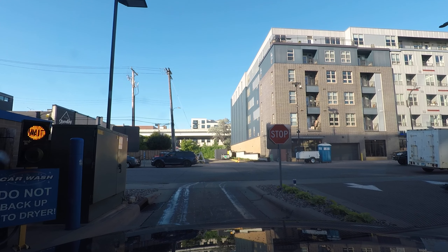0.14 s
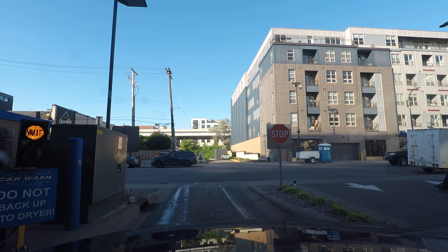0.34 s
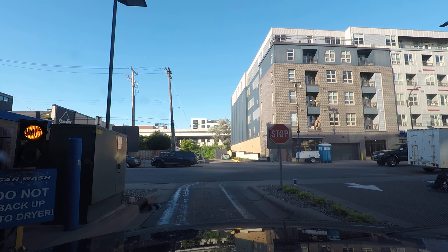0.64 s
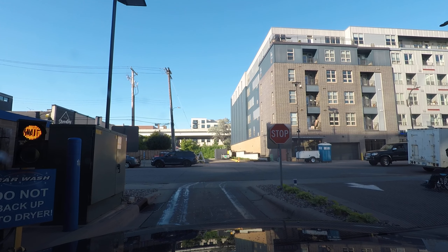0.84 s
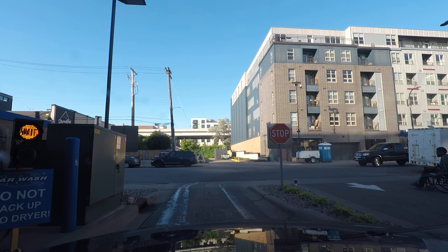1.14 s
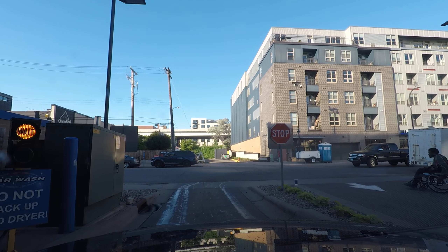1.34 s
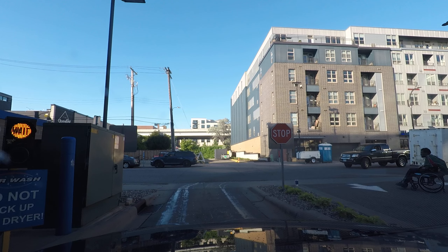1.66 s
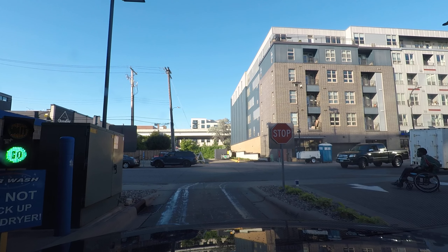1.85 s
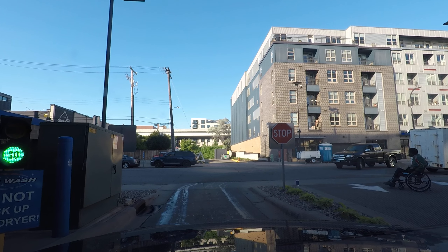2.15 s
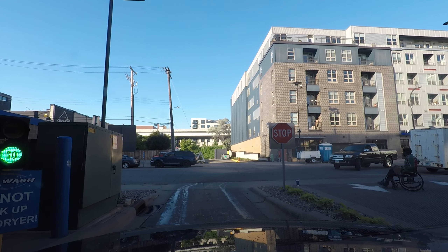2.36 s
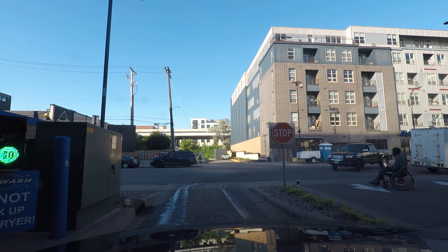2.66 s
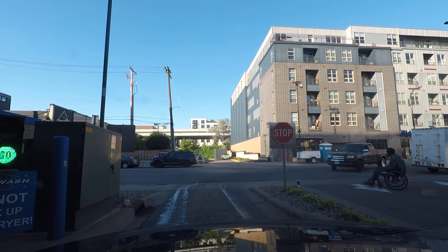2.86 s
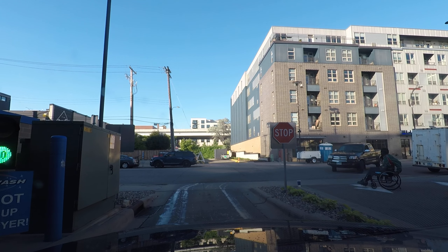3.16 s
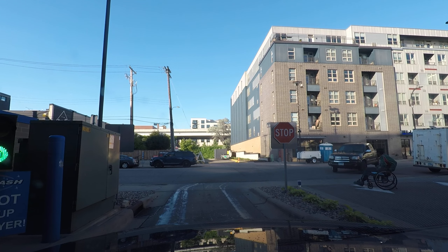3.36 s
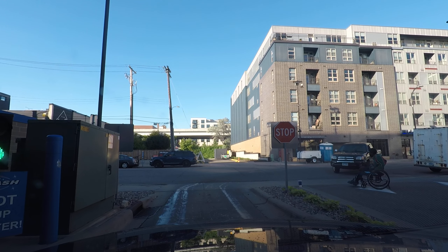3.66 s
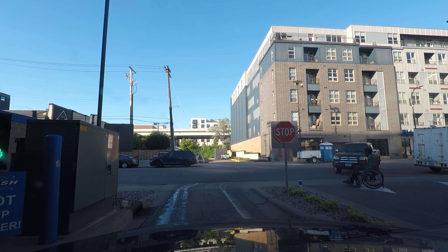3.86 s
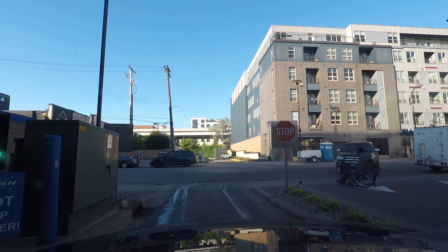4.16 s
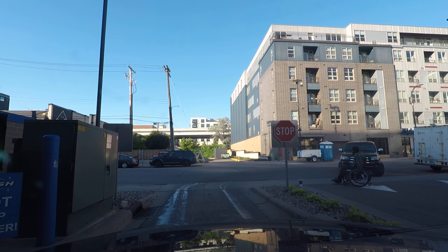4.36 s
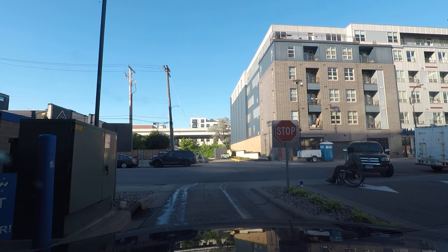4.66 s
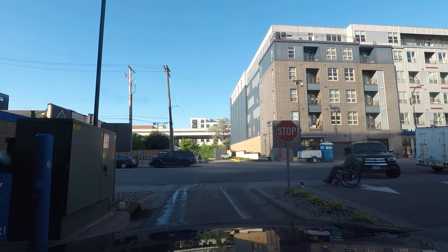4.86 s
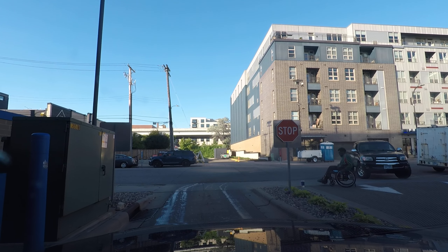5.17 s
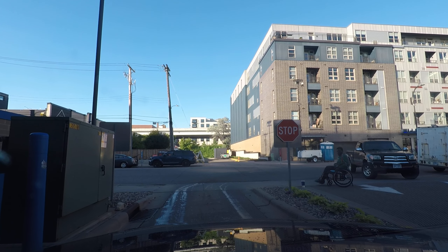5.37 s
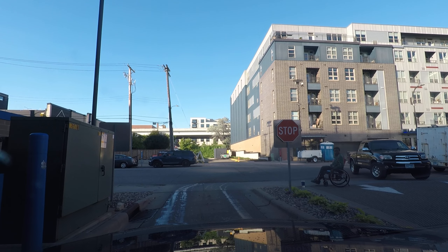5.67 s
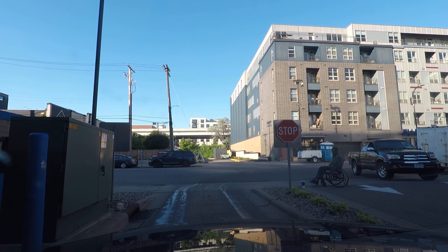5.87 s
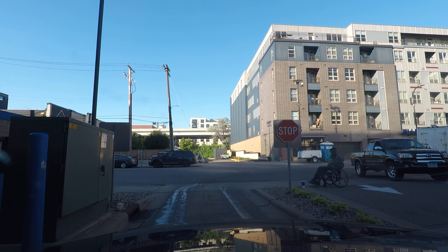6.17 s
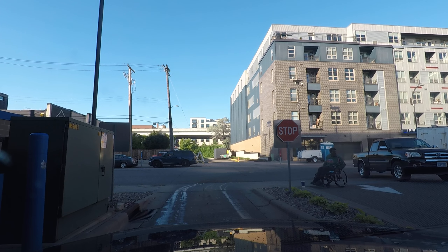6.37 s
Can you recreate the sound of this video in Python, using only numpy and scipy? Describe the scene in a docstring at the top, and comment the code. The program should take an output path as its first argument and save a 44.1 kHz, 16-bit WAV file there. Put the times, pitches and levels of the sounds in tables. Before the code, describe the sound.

Heard from inside a car at a car wash exit: large blower dryers roar steadily, gusts thump the body and the cabin booms and howls. A low fan hum wavers and surges, with a rougher higher tone flickering in and out and faint whines above. From around the middle the buffeting settles and the boom and hum gradually fade, while airy roar continues. Near the end come tiny soft scuffs and a light tick close by.

```python
"""A broad roar and lumpy buffeting, with a booming cabin, a wavering hum and faint whines, heard inside a car
that creeps out beneath the blower dryers of a car wash; later come a few brief soft scuffs and a tick close by.
Jets, gusts and nozzle are shaped noise, the cabin is noise ringing in resonances, fans are bent sine tones.
Boom and hum fade as the car moves clear; scuffs and tick are short bursts of coloured noise."""
import sys
import numpy as np
from scipy import signal
from scipy.fft import rfft, irfft
from scipy.io import wavfile
from scipy.ndimage import uniform_filter1d, minimum_filter1d

SR = 44100
rng = np.random.default_rng(int(sys.argv[2]) if len(sys.argv) > 2 else 0)


def bounce(signal):
    """Save signal as a 16-bit WAV file at the path given by the first command-line argument."""
    frames = np.transpose(np.atleast_2d(signal))
    limited = np.clip(frames, -1, 1)
    pcm = np.round(limited * 32767).astype(np.int16)
    wavfile.write(sys.argv[1], SR, pcm)


N = 287077  # samples

TIME = np.arange(N) / SR  # s
FREQS = np.fft.rfftfreq(N, 1 / SR)  # Hz
EDGE_HZ = 15200  # upper limit of the sound's band

# single gusts that shove the body and, far more faintly, lift the roar:
# t/s, half length/s, rise above the steady buffeting/dB
GUSTS = [(.04, .04, 4), (.26, .035, 2.5), (.45, .05, 3), (.87, 0.067, 8), (1.4, 0.04, 4), (1.65, .04, -1),
         (1.86, .04, 2), (2.02, 0.06, 6.5), (2.4, .13, 3), (3.24, .06, 2), (3.53, .05, 3), (4.4, 0.16, 5.5),
         (6.23, .06, 3)]


def amp(db):
    """Decibels to gain."""
    return 10 ** (np.asarray(db) / 20)


def unit(x):
    """Scales to an rms of 1."""
    return x / np.sqrt(np.mean(x ** 2) + 1e-20)


def level(points):
    """Gain at every moment, from a short curve of t/s, level/dB."""
    return amp(np.interp(TIME, *np.transpose(points)))


def receding(db, fade_db_per_s, start=0, end=np.inf):
    """Gain that holds until start, then fades evenly in dB until end (s)."""
    return amp(db - fade_db_per_s * (np.clip(TIME, start, end) - start))


def swells(rows):
    """Sum of smooth rises and falls in dB, each bell-shaped in time."""
    return sum(db * np.exp(-((TIME - s) / half_length) ** 2) for s, half_length, db in rows)


def burst(s, length):
    """Envelope with a quick start and a softer end."""
    age = np.maximum(TIME - s, 0) / length
    return (1 - np.exp(-10 * age)) * np.exp(-age ** 2)


def colour(points):
    """Gain at every frequency, from a short spectrum of f/Hz, level/dB joined along log frequency."""
    hz, db = np.transpose(points)
    return amp(np.interp(np.log(FREQS + 1), np.log(hz + 1), db))


def bell(hz, width):
    """Response of one resonance, 1 at its centre and about 3 dB down across its width (Hz)."""
    return 1 / (1 + ((FREQS - hz) / (.78 * width)) ** 2)


def noise(gain):
    """Turbulence: white noise shaped by the gain at each frequency, at an rms of 1."""
    return unit(irfft(rfft(rng.standard_normal(N)) * gain, N))


def drift(rate):
    """Slow random wandering at an rms of 1, mostly below rate (Hz)."""
    return noise(np.exp(-(FREQS / rate) ** 2))


def sustained(x, span, firmness):
    """A steady flow: evens out swells longer than span (s); firmness runs from 0 (untouched) to 1."""
    power = uniform_filter1d(x ** 2, max(int(span * SR), 8))
    return unit(x / (np.abs(power) + 1e-4) ** (np.clip(firmness, 0, 1) / 2))


def ring(modes, span, firmness):
    """Turbulence ringing in a group of resonances, whose powers add."""
    power_gain = sum((amp(db) * bell(hz, width)) ** 2 for hz, width, db in modes)
    return sustained(noise(np.sqrt(power_gain)), span, firmness)


def tone(hz, wander, flutter_db):
    """A blade tone; moving air bends its phase (rms radians) and shakes its level (rms dB)."""
    phase = 2 * np.pi * (hz * TIME + rng.random()) + wander * drift(5.6)
    return unit(np.sin(phase) * amp(flutter_db * drift(17)))


def jets():
    """Broad turbulent roar through the resonant ducts, with the rush and fizz of air over the glass."""
    # spectra of the roar, of the rush and of the finest hiss: f/Hz, relative density/dB per Hz
    roar_colour = [(190, -32.5), (330, -11.5), (365, -21), (429, 0), (526, -1.5), (563, -14), (667, -11),
                   (763, -13.5), (1210, -17.5), (1440, -16.5), (2150, -22.5), (2500, -29.5), (3250, -60.5),
                   (5500, -120)]
    rush_colour = [(1500, -21), (2400, -12), (2650, -1.5), (3000, -5.5), (3600, -4.5), (4000, -4),
                   (4450, -2), (5100, -7.5), (5650, -7), (6300, -11.5), (7100, -21.5), (7650, -27),
                   (7900, -31), (9000, -49.5)]
    fizz_colour = [(5000, -14.5), (7900, -1), (8700, 1.5), (9700, -0.5), (11300, -6.5), (12500, -9),
                   (14000, -11), (15100, -15.5)]
    # resonances and dips of the ducts: f/Hz, width/Hz, boost or cut/dB
    duct_modes = [(693, 39, -3.5), (755, 95, 5), (905, 61, 3), (1030, 50, 0.5), (1290, 40, 1.5),
                  (1432, 110, 3), (1530, 60, 1), (1650, 64, 4), (1764, 54, -4), (1970, 120, 1),
                  (2156, 120, 2.5), (2510, 70, -1.5), (2930, 170, -1.3), (3320, 70, 2), (3400, 70, 0),
                  (3570, 150, -1.5), (3990, 120, 2), (4400, 60, 1.6), (4460, 70, -1.5), (4860, 90, 1.7),
                  (4900, 70, -1.2), (5230, 160, -1.5), (7250, 250, -2.5), (7660, 130, 1.5),
                  (7900, 200, -1.5)]
    roar_db, rush_db, fizz_db, fade_db_per_s = -28.5, -39, -62.5, 0.29
    gust_share = 0.049  # how much of each gust's dB reaches the roar
    corner_hz = 620

    ducts = amp(sum(db * bell(hz, width) for hz, width, db in duct_modes))
    above_body = 1 / np.sqrt(1 + (corner_hz / (FREQS + 1)) ** 8)
    roar_gain = receding(roar_db, fade_db_per_s) * amp(gust_share * swells(GUSTS) + 0.14 * drift(19))
    roar = noise(colour(roar_colour) * ducts * above_body) * roar_gain
    rush_gain = receding(rush_db, fade_db_per_s) * amp(0.2 * drift(14))
    rush = noise(colour(rush_colour) * ducts) * rush_gain
    fizz = noise(colour(fizz_colour)) * amp(fizz_db + 0.34 * drift(20))
    return roar + rush + fizz


def buffeting():
    """Lumpy gusts push the whole body; it passes only their lowest part."""
    # spectrum of the push: f/Hz, relative density/dB per Hz
    push_colour = [(5, -18), (16, -8.5), (25, 0), (36, 0), (45, 6.5), (54, -5), (66, -9.5), (80, -11.5),
                   (100, -20), (200, -68), (400, -140)]
    push_db, fade_db_per_s = -20.5, 2.5  # ahead of the body's low-pass
    eases_s, settles_s = 0.65, 4.2  # the buffeting dies down between these times

    push = receding(push_db, fade_db_per_s, eases_s, settles_s) * amp(swells(GUSTS))
    gusts = sustained(noise(colour(push_colour)), span=0.16, firmness=0.7) * push
    return irfft(rfft(gusts) / (1 + (FREQS / 130) ** 6), N)


def body():
    """Cabin and panels ring under the jets: a low drone, booms and howls, each group at its own level."""
    # resonances of each group: f/Hz, width/Hz, relative level/dB
    drone_modes = [(126.8, 32.5, -0.5), (153, 40, -8), (92, 23, -9.5)]
    boom_modes = [(180, 39, -6.5), (213, 58, 0), (242, 35, 1)]
    upper_boom_modes = [(273.4, 29, 1), (289.8, 44.7, -2.8)]
    howl_modes = [(480, 28, 0.7), (512, 40, -0.17), (404, 93, -2)]
    upper_howl_modes = [(540, 54, -1.6), (584, 47, -0.39)]
    # groups that come and go as the car moves under the jets: t/s, level/dB
    upper_boom_level = [(0, -21.5), (.45, -24), (.6, -17.5), (.82, -23.5), (1.12, -19), (1.7, -20.5),
                        (2.2, -22.5), (2.36, -20), (2.7, -21.5), (3.9, -23.5), (4.33, -17), (4.68, -24.5),
                        (5.02, -23), (5.3, -25), (6, -28), (6.5, -30.5)]
    howl_level = [(0, -29), (.25, -27.5), (.85, -27), (1.5, -29), (1.75, -26), (2.15, -29.5), (2.9, -28),
                  (3.85, -29), (4.15, -27.5), (4.9, -27), (5.6, -28), (6.5, -30.5)]
    upper_howl_level = [(0, -27.5), (.6, -32), (.78, -32), (1.14, -28.5), (1.24, -41), (1.65, -46),
                        (2, -34), (2.45, -35), (2.85, -33), (3.35, -35), (3.8, -36), (4.05, -30),
                        (4.45, -34.5), (4.95, -32), (5.35, -35), (5.65, -29.5), (6.1, -36), (6.5, -31)]
    # brief swells and lulls: t/s, half length/s, change/dB
    drone_swells = [(.11, 0.12, 4.5), (.89, .03, 3), (.99, 0.037, 6.5), (1.1, .05, -5), (1.59, 0.029, 7.5),
                    (2.18, .035, 3), (2.35, .035, 3), (2.74, 0.042, 5), (2.98, 0.11, -3.5),
                    (3.12, 0.028, 6), (3.51, .05, 3), (4.09, .03, -3), (4.16, 0.026, 4), (4.31, 0.029, 7),
                    (4.54, 0.032, 6), (4.89, .03, 3.5), (5.69, 0.05, 4.5), (5.83, 0.04, 3), (6.16, .04, 2)]
    boom_swells = [(.2, .05, 4), (.36, 0.03, 6), (.66, .04, -2), (1.34, .035, 2), (1.56, .035, 2.5),
                   (1.86, .03, 2.5), (1.96, .03, 6), (2.23, 0.029, 4.5), (2.63, 0.044, 5.5),
                   (2.71, .03, -7), (2.79, 0.028, 2.5), (2.96, .035, 3), (3.59, 0.026, 2.5),
                   (4.01, .04, 3.5), (4.46, .04, 0), (4.79, 0.037, 3), (5.29, .04, -2.5), (5.51, .035, 4),
                   (5.91, .04, 5), (6.5, 0.06, -12)]
    upper_boom_swells = [(.21, .03, 4), (.94, 0.027, 6.5), (1.09, 0.027, 3.5), (1.18, 0.028, 2.5),
                         (1.31, .03, 4.5), (2.35, 0.032, 4), (2.49, 0.024, 7.5), (2.8, .03, 1.5),
                         (3.07, 0.021, 4), (3.89, 0.042, -4), (4.34, .035, -1), (4.6, .03, -4),
                         (5.02, 0.037, 3.5), (5.26, 0.027, -8)]
    drone_db, boom_db, boom_fade_db_per_s = -24.5, -21, 1.03
    clear_s = 3.8  # the cabin leaves the jets and the boom starts to fade

    drone_gain = amp(drone_db + swells(drone_swells))
    boom_gain = receding(boom_db, boom_fade_db_per_s, clear_s) * amp(swells(boom_swells))
    upper_boom_gain = level(upper_boom_level) * amp(swells(upper_boom_swells))
    drone = drone_gain * ring(drone_modes, span=0.08, firmness=0.8)
    boom = boom_gain * ring(boom_modes, span=0.087, firmness=0.85)
    upper_boom = upper_boom_gain * ring(upper_boom_modes, span=0.09, firmness=0.9)
    howl = level(howl_level) * ring(howl_modes, span=0.15, firmness=0.71)
    upper_howl = level(upper_howl_level) * ring(upper_howl_modes, span=0.1, firmness=1.0)
    return drone + boom + upper_boom + howl + upper_howl


def fans():
    """Spinning blades and motors: a wavering low tone, a rough high one, a faint hum and trembling whines."""
    # loud and dead spots that the car creeps through, for each blade tone: t/s, level/dB
    low_tone_level = [(0, -33), (.25, -23), (.5, -32), (.8, -26), (1.3, -22.5), (1.8, -22.5), (2.28, -28),
                      (2.45, -24), (2.72, -23), (3.05, -25), (3.42, -19.5), (3.8, -22), (4.1, -21.5),
                      (4.42, -24), (4.58, -22), (4.75, -31.5), (5.05, -25), (5.4, -28), (5.9, -35),
                      (6.5, -38)]
    high_tone_level = [(0, -39), (.2, -27.5), (.58, -22.5), (.75, -28.5), (.93, -22.5), (1.05, -36),
                       (1.25, -35.5), (1.62, -47), (1.85, -31), (2.0, -26.5), (2.35, -31.5), (2.6, -28),
                       (2.87, -24.5), (3.04, -28.5), (3.2, -54), (3.32, -25.5), (3.42, -39), (3.6, -27),
                       (3.75, -37.5), (3.95, -24.5), (4.1, -24), (4.28, -27), (4.45, -38), (4.9, -34.5),
                       (6.5, -36.5)]
    # the low tone wavers widely in the gusty air, then less: t/s, phase wander/rms radians
    low_tone_wander = [(0, .9), (2.1, 1.1), (2.45, .5), (6.5, 0.49)]
    # surges of the air stream that swell the low tone: t/s, half length/s, rise/dB
    surges = [(.66, 0.033, 13.5), (.99, 0.039, 13.5), (1.38, 0.042, 5), (1.76, .04, 1), (2.11, 0.023, 11),
              (2.22, .022, 5), (2.425, 0.043, 12), (4.17, 0.021, 8), (4.9, 0.035, 9), (5.07, 0.021, 11)]
    # faint, trembling tones of the other fans and motors: f/Hz, level/dB
    whine_tones = [(1060.6, -45.5), (1591, -56.5), (1796.5, -53.5), (1826.5, -57), (2557.5, -57.5),
                   (2666, -65.5), (2923, -68.5), (3823, -65), (4020, -60.5)]
    low_hz, high_hz = 255.3, 530.3
    skirt_db, skirt_width_hz = -12.5, 28  # turbulence around the high tone, relative to it
    motor_hz, motor_db = 216.6, -33

    wander = np.interp(TIME, *np.transpose(low_tone_wander))
    low_gain = level(low_tone_level) * amp(swells(surges))
    low = low_gain * tone(low_hz, wander, flutter_db=1.0)
    skirt = amp(skirt_db) * noise(bell(high_hz, skirt_width_hz))
    high = level(high_tone_level) * unit(tone(high_hz, wander=0.35, flutter_db=1.1) + skirt)
    motor = amp(motor_db) * tone(motor_hz, wander=0.6, flutter_db=2.0)
    whines = sum(amp(db) * tone(hz, wander=0.75, flutter_db=3.5) for hz, db in whine_tones)
    return low + high + motor + whines


def nozzle():
    """A passing air jet adds a brief band of brighter roar."""
    passes_s, half_length_s, peak_db = 1.1, 0.27, -35.5
    centre_hz, width_hz = 1510, 340
    passing = np.exp(-((TIME - passes_s) / half_length_s) ** 2)
    return amp(peak_db) * passing * noise(bell(centre_hz, width_hz))


def scuffs():
    """Short soft rubs inside the car: bursts of noise with one shared colour, tilted for each."""
    # rubs: t/s, length/s, level ahead of the envelope/dB, brightness/dB per octave
    rubs = [(4.540, .024, -43, -8.5), (4.563, .014, -33.5, -10.5), (4.576, .015, -41, -9),
            (5.767, .016, -62, 5), (5.794, .024, -63, 6)]
    # shared spectrum: f/Hz, relative density/dB per Hz
    rub_colour = [(1000, -90), (2800, -20), (3400, 2), (5000, -2), (6000, 2), (7500, -3.5), (9200, -0.5),
                  (11200, -7), (12000, 2.5), (15000, 0)]

    octaves = np.log2(np.clip(FREQS, 3000, EDGE_HZ))  # the tilt acts only above 3 kHz
    rub_gain = colour(rub_colour) * (FREQS < EDGE_HZ)
    total = np.zeros(N)
    for s, length, db, bright_db in rubs:
        total += amp(db) * burst(s, length) * noise(rub_gain * amp(bright_db * octaves))
    return total


def tick():
    """A light touch: a short burst of noise in one high resonance."""
    start_s, length_s, level_db = 6.063, .016, -40.5  # level ahead of the envelope
    # squaring the response narrows it to about two thirds of 1000 Hz
    resonance = bell(5950, 1000) ** 2
    return amp(level_db) * burst(start_s, length_s) * noise(resonance)


def scene():
    """Everything as it arrives inside the car, in one channel."""
    return (jets() + buffeting() + body() + fans() + nozzle() + scuffs() + tick())[None]


def record(dry):
    """A gentle limiter dips the gain on the highest bass crests; then soft ends and the band limit."""
    ceiling, end_fade_s = 0.65, .004
    bass = irfft(rfft(dry) / (1 + (FREQS / 700) ** 4), N)
    squeeze = (1 + (bass / ceiling) ** 4) ** (-1 / 4)
    # hold each dip, then smooth it (spans in samples)
    gain = uniform_filter1d(minimum_filter1d(squeeze, size=400), size=400)
    ends = np.minimum(np.minimum(TIME, TIME[::-1]) / end_fade_s, 1)
    band_limit = signal.firwin(511, EDGE_HZ, window=("kaiser", 9), fs=SR)
    return signal.oaconvolve(dry * gain * ends, band_limit[None], "same")


dry = scene()
out = record(dry)
bounce(out)
```